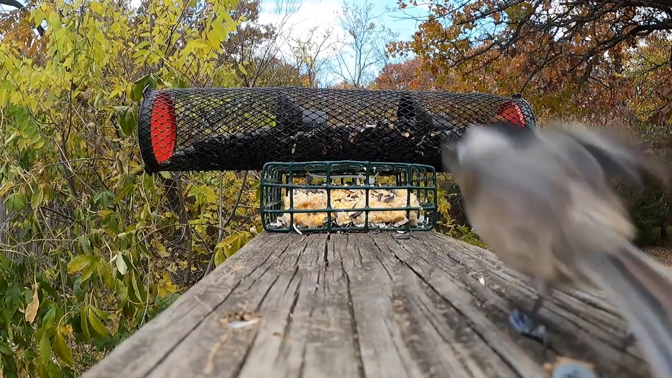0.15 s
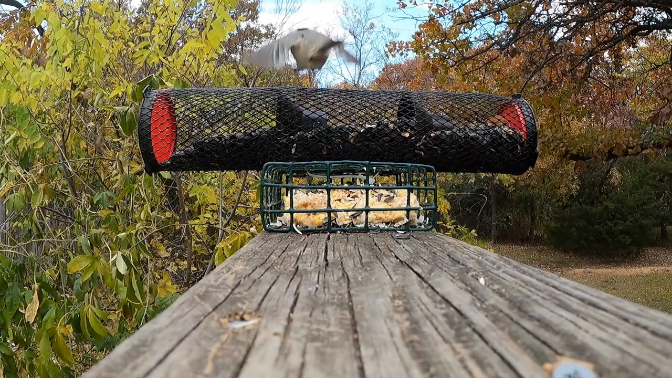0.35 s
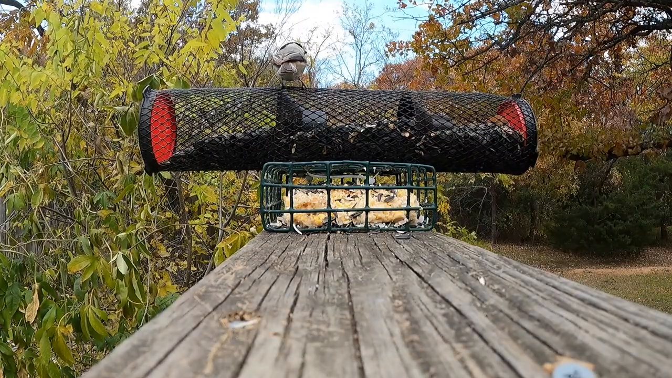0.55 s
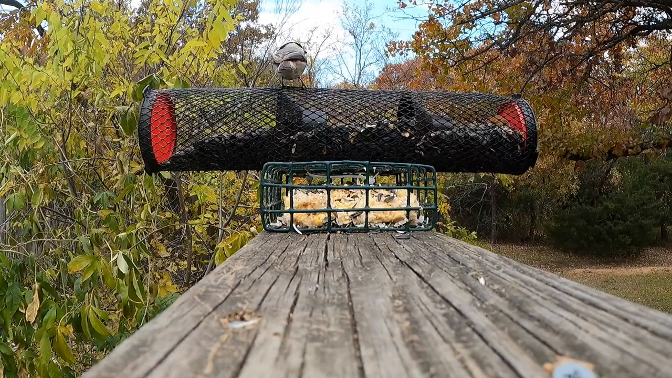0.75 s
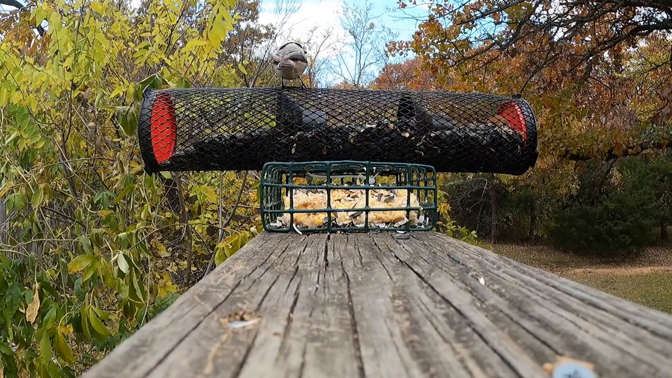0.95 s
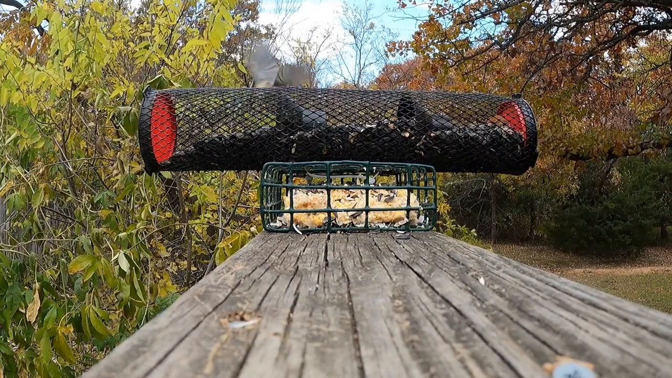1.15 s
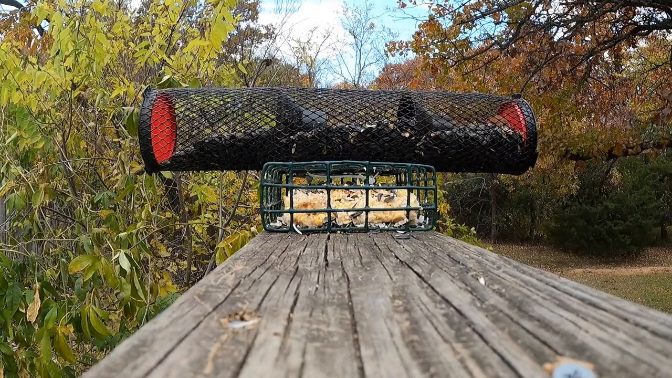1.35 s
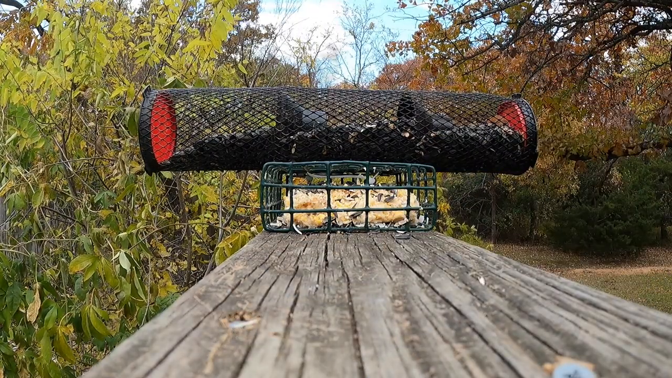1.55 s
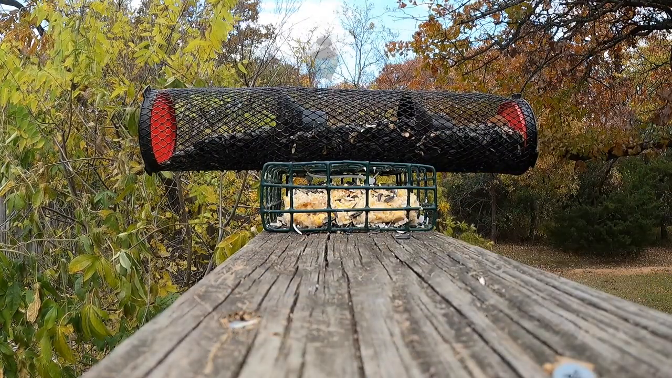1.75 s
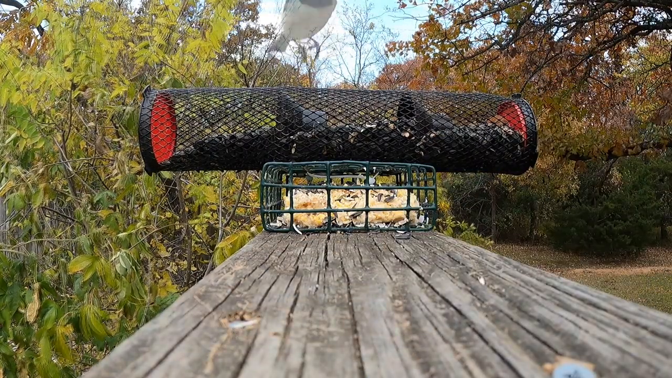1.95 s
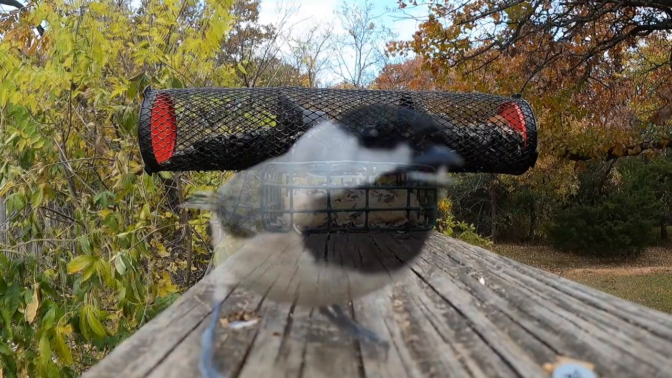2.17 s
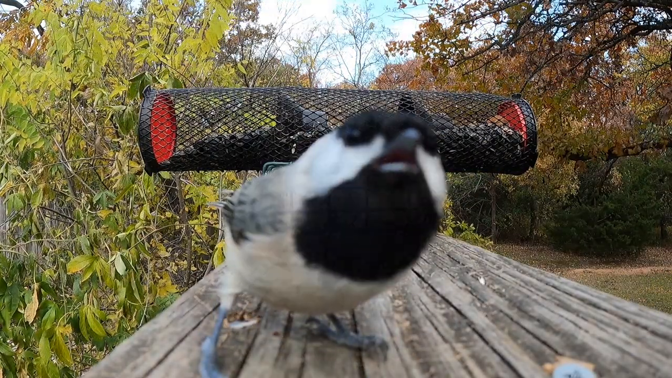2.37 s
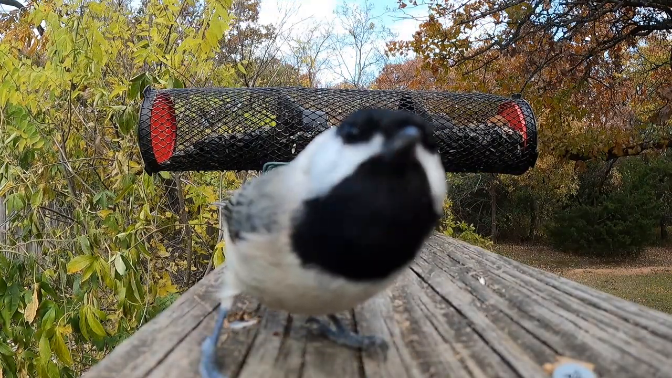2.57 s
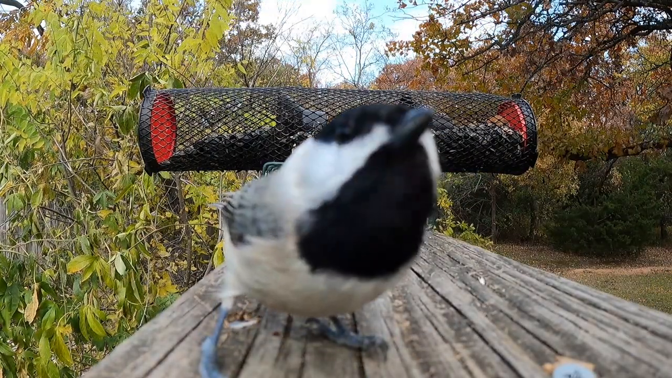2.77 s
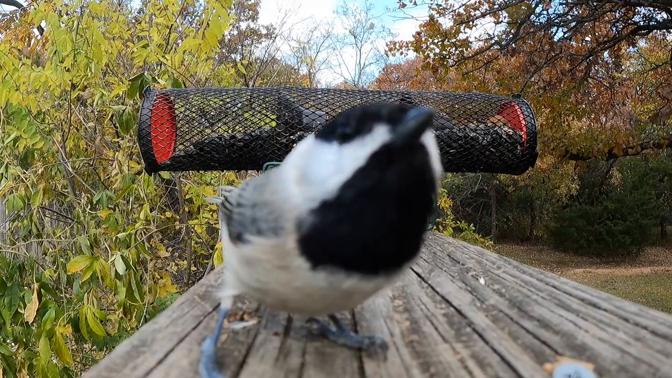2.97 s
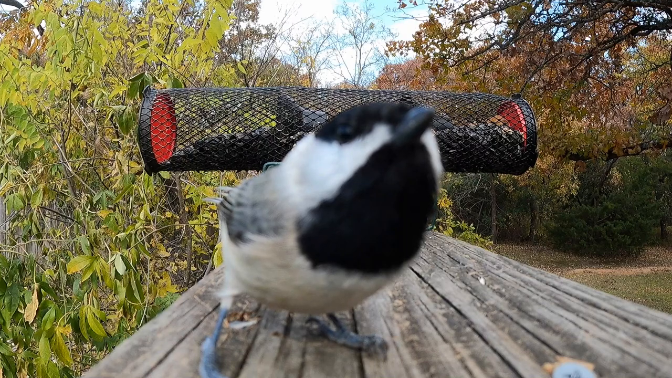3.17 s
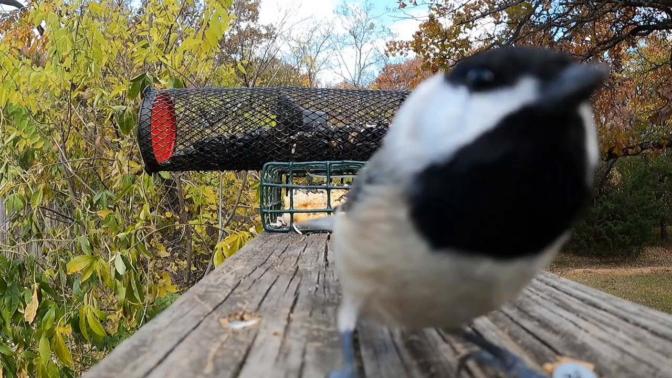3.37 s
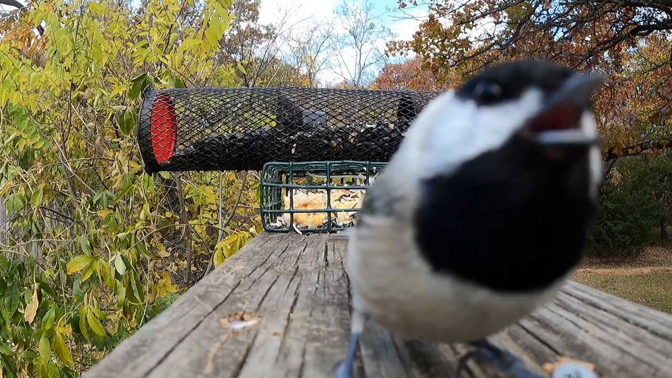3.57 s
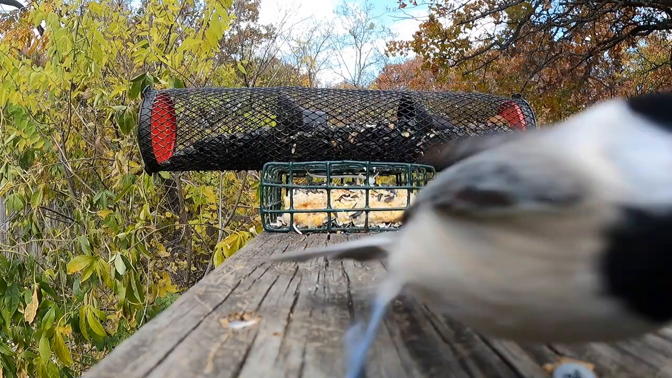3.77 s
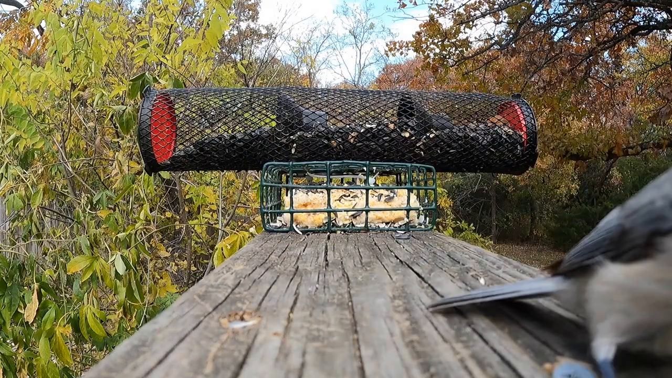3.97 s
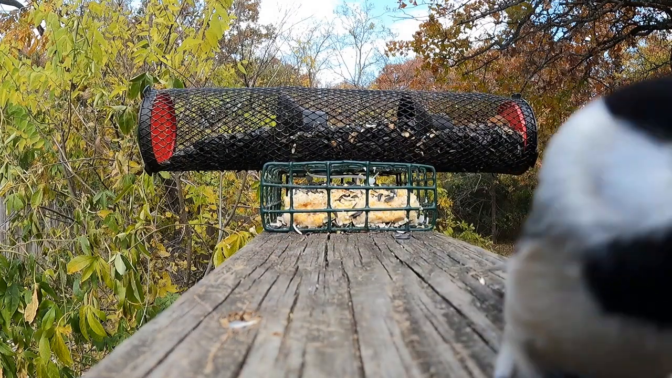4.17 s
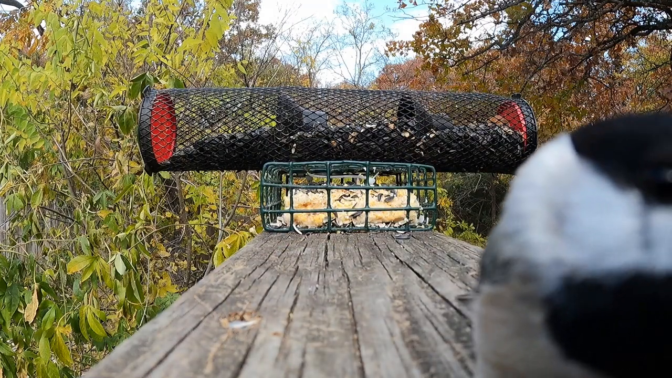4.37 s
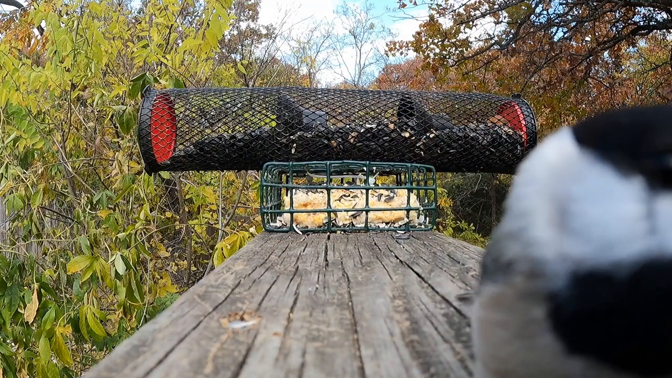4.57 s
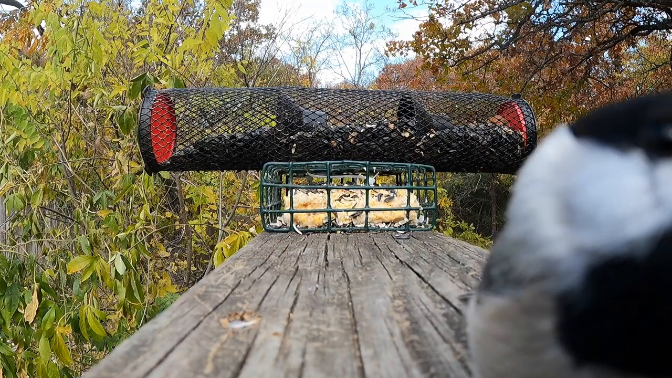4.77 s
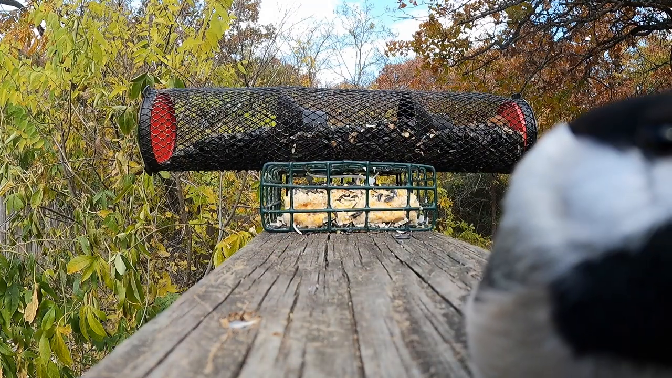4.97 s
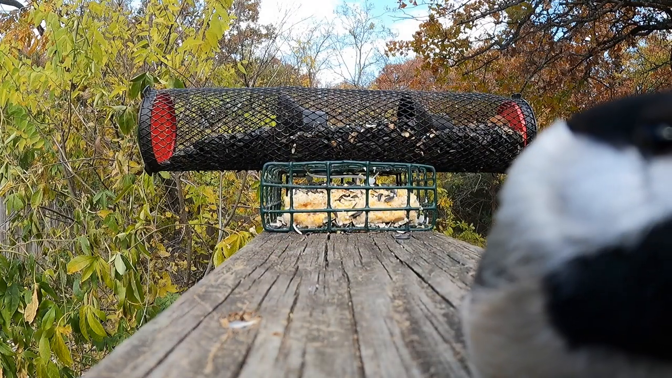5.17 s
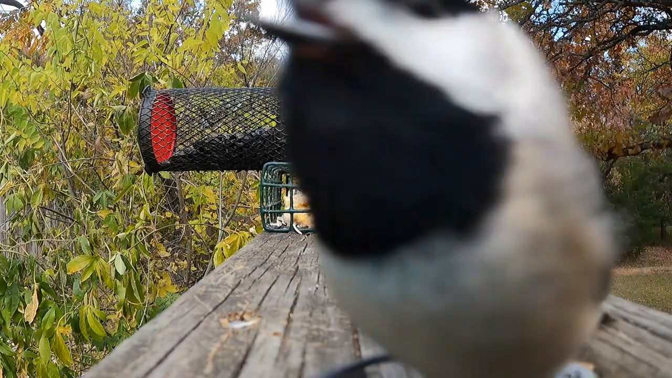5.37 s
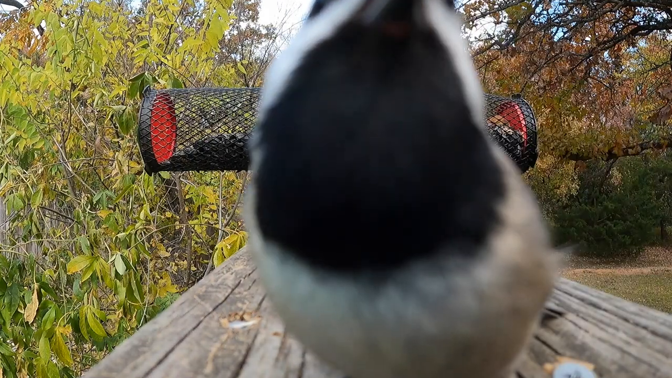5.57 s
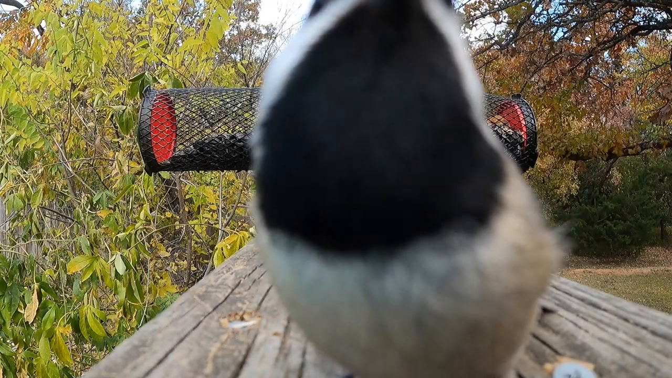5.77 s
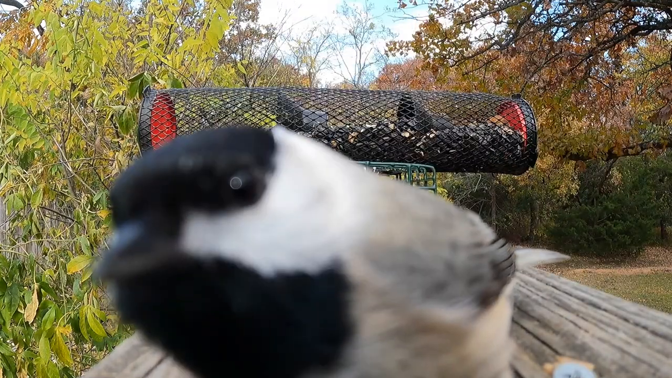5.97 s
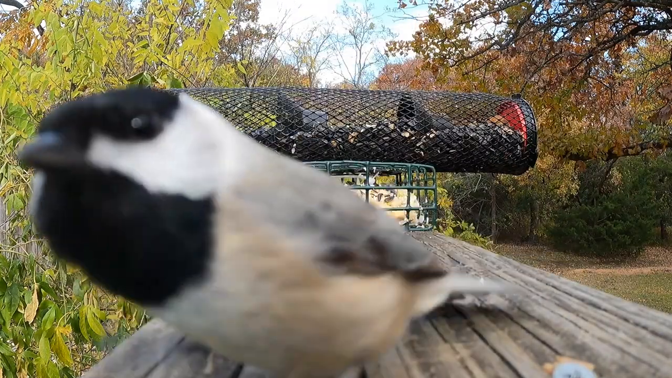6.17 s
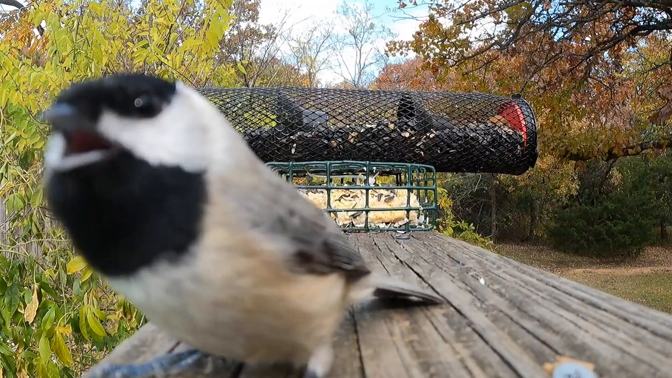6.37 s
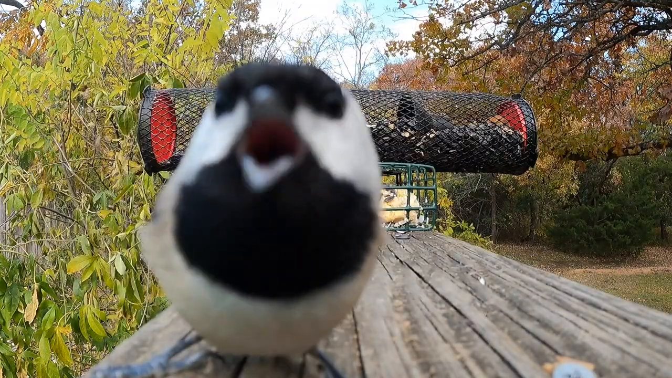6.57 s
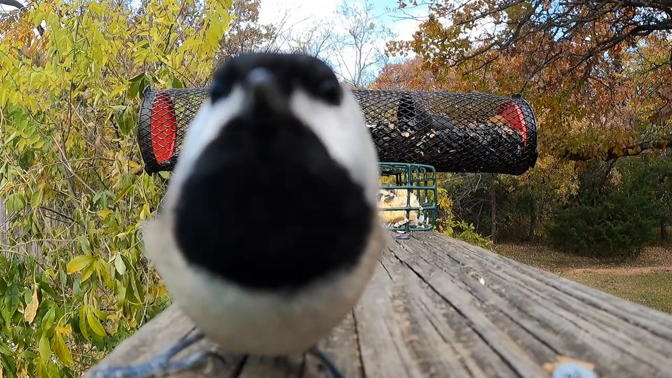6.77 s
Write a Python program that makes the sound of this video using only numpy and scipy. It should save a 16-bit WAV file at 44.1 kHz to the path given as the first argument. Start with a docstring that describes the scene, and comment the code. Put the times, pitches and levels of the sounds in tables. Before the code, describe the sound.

A chickadee flutters off and lands on a wooden plank with soft scuffs, then sings short, bright, gurgling phrases very close to the microphone.

```python
"""Chickadee on a plank feeder

A chickadee sings five gurgling phrases at arm's length from a stereo microphone.
Its two-sided voice box is built from gliding tones: whistles, quick sweeps, trills and buzzy warbles.
Shaped noise makes its breath, wings, claws, a low rumble, a soft higher background and a faint hiss;
short low waves make thumps."""
import sys
import numpy as np
from scipy import signal
from scipy.fft import rfft, irfft, next_fast_len
from scipy.io import wavfile
from scipy.ndimage import uniform_filter1d, map_coordinates

SR = 44100
rng = np.random.default_rng(int(sys.argv[2]) if len(sys.argv) > 2 else 0)


def digitize_waveform(pressure):
    """Quantize a signal to 16-bit integers and store it at the path in sys.argv[1].

    Rows of a 2-D input are taken as channels; values are limited to [-1, 1].
    """
    field = np.atleast_2d(pressure).T
    bounded = np.clip(field, -1, 1)
    quanta = np.round(bounded * 32767).astype(np.int16)
    wavfile.write(sys.argv[1], SR, quanta)


N = 301203  # length of the scene in samples

# held whistles: [start t/s, scoop t/ms, attack t/ms, release t/ms, length t/ms,
#   first f/Hz, early f/Hz, late f/Hz, level/dB, swell/dB]
WHISTLES = [(2.2172, 8, 6, 22, 46, 6110, 7600, 7314, -17.5, 5),
            (2.3281, 3, 5, 24, 52, 6967, 6070, 6450, -11.5, 0.5),
            (3.502, 12, 21, 12, 39.5, 6880, 7700, 7110, -19.5, 4.3),
            (3.591, 3, 7, 35, 59.6, 7100, 6070, 6520, -13, 1.8),
            (4.3093, 5.5, 21, 9.4, 46.4, 6036, 7620, 7320, -11.5, -5),
            (4.4073, 2.5, 6.4, 14, 55, 7410, 6090, 6450, -13, 0.7),
            (5.46, 2.6, 2.2, 15, 34, 4350, 4440, 4930, -21.5, 2),
            (6.44, 5.1, 9, 16, 42, 10350, 9960, 9500, -52.5, 10.5),
            (6.737, 8.4, 12, 12.5, 61.4, 1960, 3230, 3402, -18.5, 7.5)]
# bent whistles, each sung once; a list of curves: [t/s, pitch f/Hz, level/dB]
GLIDES = [
    [(5.4107, 8030, -39), (5.4165, 6600, -13), (5.4203, 5950, -12), (5.4215, 6000, -12),
     (5.4238, 6740, -15), (5.4252, 7400, -39)],
    [(5.4595, 4310, -34), (5.4615, 4830, -14), (5.4631, 5680, -13), (5.466, 6280, -18), (5.4723, 6460, -18),
     (5.4928, 6500, -15), (5.5001, 6120, -13), (5.5057, 5160, -13), (5.5257, 1850, -42)],
    [(6.3438, 6490, -40), (6.3494, 7360, -27), (6.367, 7020, -17), (6.377, 6040, -11), (6.3788, 6240, -13),
     (6.3808, 6910, -40)],
    [(6.6405, 9290, -46), (6.647, 8300, -32), (6.6527, 7920, -22), (6.6569, 7770, -20), (6.6601, 7180, -17),
     (6.6623, 6550, -20), (6.6647, 6420, -45)],
    [(6.4488, 5000, -46), (6.4553, 4910, -33), (6.47, 4850, -29), (6.4816, 4540, -26), (6.4854, 4910, -14),
     (6.4863, 4810, -19), (6.4878, 4320, -44)],
]
# short sweeps, including the high trill's first dips, the last pip's upturn and faint mixing tones:
#   [start t/s, rise t/ms, fall t/ms, first f/Hz, peak f/Hz, last f/Hz, peak level/dB]
SHORT_SWEEPS = [(3.478, 22, 12, 6210, 7000, 7400, -56.5), (5.3195, 4, 6, 6370, 7500, 8000, -52.5),
                (5.33, 6, 29, 6290, 7890, 7960, -46.5), (5.4013, 1.6, 3.2, 5540, 6770, 6500, -32.5),
                (5.4248, 1.9, 4, 8850, 9200, 9100, -39.5), (5.4464, 7, 7.5, 1390, 2890, 3530, -29.5),
                (5.449, 2.1, 7.3, 4300, 4700, 6350, -20), (5.46, 27, 56, 2570, 2810, 2900, -51.5),
                (5.506, 12.6, 9, 6100, 6760, 5840, -29), (5.531, 6.3, 3.9, 4430, 3850, 3280, -20),
                (5.5409, 0.79, 2.6, 4530, 5140, 4200, -18), (5.574, 0.75, 1, 7400, 5900, 4900, -11),
                (5.5828, 3.6, 2.1, 7000, 5100, 4886, -17), (5.593, 2.36, 2.1, 6100, 5230, 4510, -12.5),
                (5.8305, 5.1, 6, 2020, 2900, 2784, -31), (6.34, 1.8, 2.5, 3450, 6540, 8200, -40),
                (6.3799, 1.5, 2.4, 8100, 8200, 8800, -38.5), (6.5117, 1.4, 1.7, 2893, 3180, 3070, -24),
                (6.5115, 2.1, 2.5, 6160, 6400, 6030, -12.5), (6.515, 2.9, 4.9, 5470, 6400, 7500, -13.5),
                (6.518, 2.3, 13, 7260, 7540, 7860, -33), (6.5412, 2.1, 4.5, 6350, 2850, 1310, -31.5),
                (6.571, 2.6, 1.5, 6380, 5830, 6480, -13), (6.5735, 2.5, 6.4, 9200, 9500, 8660, -43),
                (6.585, 7.8, 7.3, 7440, 5840, 3240, -12.5), (6.5978, 3.2, 4, 2270, 6400, 5970, -20),
                (6.6414, 12, 11, 4480, 4620, 4420, -17.5), (6.645, 10.5, 9, 5530, 5910, 5590, -28.5),
                (6.646, 4.6, 24, 3480, 3220, 2900, -42), (6.675, 1.6, 3.7, 4900, 4310, 3700, -26),
                (6.7098, 2.2, 4.3, 4300, 4680, 4300, -19)]
# five syllables that come back, each a few short sweeps:
#   [start t/ms, rise t/ms, fall t/ms, first f/Hz, peak f/Hz, last f/Hz, peak level/dB], before stretching
SYLLABLES = [
    [(1, 2.2, 4.2, 4950, 5430, 4440, -17.5), (5.4, 3.9, 3.6, 4340, 4320, 4480, -18.5),
     (14.6, 3.8, 5.3, 3250, 2920, 1760, -26.5)],
    [(.6, 1.6, 7.5, 2900, 2850, 1950, -30), (.6, 2.2, 6.5, 6050, 5800, 3650, -28),
     (2.3, 4.2, 3.1, 8600, 6150, 6350, -26.5), (10, 14, 6.6, 4880, 5390, 5610, -12.2),
     (24.7, 4.7, 4.7, 3300, 5190, 5700, -11),],
    [(1.6, 2.9, 4, 3330, 3770, 4510, -25), (1.6, 1.8, 3.9, 6400, 6930, 7900, -26)],
    [(0, 18, 5, 10100, 9750, 8500, -38), (13.8, 6.7, 2.5, 4400, 4740, 4400, -24)],
    [(0, 1.1, 1.5, 2000, 4000, 7000, -38), (3.6, 3.5, 4.7, 3350, 2950, 2450, -21),
     (14, 5.4, 10, 1560, 1890, 2300, -28), (29.5, 1.1, 6.5, 4500, 5200, 9500, -24),
     (34.4, 4.2, 10.5, 3160, 3110, 1400, -26), (44, 8, 8, 1800, 1150, 1700, -49)],
]
# when each syllable is sung, one list per syllable: [t/s, stretch in time, added level/dB]
SUNG = [
    [(2.397, 0.87, 0.5), (3.6661, 0.94, 1.5), (4.4845, 0.92, 0)],
    [(2.438, .98, 0.16), (3.7051, 1.035, -0.2), (4.5255, 1.034, -1.4)],
    [(2.523, 0.7, 3), (3.792, 0.62, 4), (4.6133, 1.05, 2.5), (6.4327, 0.91, 2), (6.6335, 0.905, 2.5)],
    [(2.5305, 0.97, 2), (3.7998, 1.2, -3), (4.6217, 1.14, -2)],
    [(2.572, 0.97, 0), (3.8412, 0.99, 0.5), (4.6647, 1, 0.1), (6.676, 1.074, -0.4)],
]
# hooked notes of the second and fifth syllable, keyed by syllable index:
#   [t/ms from its start before stretching, pitch f/Hz, level/dB]
HOOKS = {1: [(34.1, 5450, -37), (38, 5050, -20), (42.1, 4890, -14), (48.8, 4630, -12), (51, 4470, -13),
         (53.3, 5430, -12), (56.2, 5740, -40)], 4: [(20.1, 3620, -43), (22.8, 3910, -17), (25.5, 3690, -15),
         (28.6, 3320, -22), (30.8, 4920, -13), (33, 4900, -42)]}
# high trill of V-shaped dips: [t/s, dips per second f/Hz, bottom pitch f/Hz, level/dB]
TRILL = [(5.6, 122, 4500, -12), (5.64, 123, 4300, -12.5), (5.69, 121, 3850, -13), (5.712, 104, 3450, -14),
         (5.7255, 104, 3350, -19)]
# one falling pip of the low trill: [share of its length, pitch f/Hz, level/dB]
PIP = [(0, 3200, -26), (.15, 3050, -3), (.5, 2880, -.3), (.82, 2650, -2), (1, 2150, -26)]
# when the pips come: [t/s, length t/ms, added level/dB]
PIPS = [(5.727, 12.3, -22.5), (5.7437, 9.4, -21), (5.7567, 10.6, -20.5), (5.7701, 13.2, -21.5),
        (5.782, 11.5, -20), (5.7951, 11.5, -19.5), (5.808, 13, -21), (5.822, 12, -22.5)]
# buzzy closing notes: [start t/s, length t/s, first swing rate f/Hz, last swing rate f/Hz, top f/Hz,
#   added level/dB, turns of the swing done at the start]
WARBLES = [(2.628, .21, 283, 257, 2617, -18, .62), (3.896, 0.29, 283, 270, 2697, -22, 0.78),
           (4.725, .191, 277, 252, 2676, -18.5, 0.88)]
# their common course: [share of length, middle below the top f/Hz, swing before widening f/Hz, level/dB]
WARBLE_COURSE = [(0, 1000, 150, -34.5), (.05, 450, 279.4, -17), (.17, 110, 415, -4),
                 (0.348, 20, 380, -0.96), (.6, 5, 380, -0.85), (.87, 40, 450, -2.75), (0.958, 250, 450, -8),
                 (1, 500, 441, -28)]
# the throat favours the overtones of low notes: [pitch f/Hz, 2nd level/dB, 3rd level/dB, 4th level/dB]
OVERTONES = [(1480, 7, -27, -35), (2330, -1.5, -32, -34), (2644, -12.5, -33.5, -59),
             (2880, -23, -58, -53.5), (3240, -32, -53.5, -51.5), (4000, -36, -60.5, -70),
             (4800, -53.5, -68.5, -98.5), (6534, -51, -82.5, -99), (8000, -60.5, -81, -99)]
# sum and difference tones of the two voices: [f/Hz, level/dB]
MIXING = [(1000, -77), (1900, -5), (3000, -46.5), (8000, -64.5), (11000, -30), (13000, -32), (15000, -42.5)]
# colour of the air rushing past the membranes: [f/Hz, relative level/dB]
BREATH = [(1500, -57), (2500, -14), (5000, 11), (8000, -8), (9000, -21), (11500, -16.5), (13200, -19),
          (14000, -57.5)]
# colour of the air in the high trill: [f/Hz, relative level/dB]
TRILL_AIR = [(3000, -50), (5000, 9), (8000, 0), (9000, -35), (10200, -9), (13000, -12), (14000, -54.5)]
# the head turns: [t/s, left minus right level/dB, left lag t/us]
HEAD = [(2.2, -1.5, 18.8), (3.39, -6, 14.6), (3.5, -11.5, 18), (3.7, -3, 14.5), (4.11, -9.5, 8.8),
        (4.29, -3.5, 9), (4.95, -6, 13), (4.97, 4, 15), (6.24, -5, 16.6), (6.35, 5.5, 8.3),
        (6.83, -3.5, 36)]
# feathers swish as wings beat: [t/s, length t/s, level/dB]
WINGS = [(0.181, 0.054, -51.5), (0.217, 0.11, -48), (0.397, 0.092, -72), (0.922, 0.056, -64.5),
         (1.103, 0.14, -68.5), (1.193, 0.1, -54), (1.273, 0.11, -62), (1.495, 0.15, -73),
         (1.841, 0.14, -67.5), (2.052, 0.24, -52.5), (2.136, 0.097, -54.5), (3.347, 0.11, -66.5),
         (6.259, 0.05, -66.5)]
# colour of the feather noise: [f/Hz, relative level/dB]
FEATHERS = [(240, -21), (400, 3.5), (735, 4.5), (1290, -5.5), (1840, -0.5), (2680, -13.5), (4860, -5),
            (7800, -14), (10100, -86), (17200, -120)]
# claws scuff the plank and the mesh: [t/s, level/dB before a 1 dB lift, centre f/Hz, 60 dB fade t/s]
CLAWS = [(0.2044, -53, 4640, 0.029), (0.2469, -37, 1360, 0.054), (0.253, -40, 1460, 0.023),
         (0.2857, -42.5, 1890, 0.015), (0.464, -54.5, 5150, 0.044), (1.2379, -49, 1810, 0.013),
         (1.2784, -51, 1810, 0.022), (1.7374, -65, 5180, 0.023), (1.9001, -63.5, 4260, 0.022),
         (2.157, -52, 2380, 0.017), (2.163, -32.5, 1910, 0.033), (2.1984, -50, 7140, 0.0094),
         (3.3544, -55.5, 2120, 0.025), (3.373, -58.5, 4500, 0.058), (4.2137, -55, 2042, 0.096)]
# soft thumps of air and feet: [t/s, peak level/dB, pitch f/Hz]
THUMPS = [(0.208, -36, 87), (0.243, -34, 91.5), (0.258, -31.5, 62.4), (0.289, -53, 102), (0.319, -44, 48.7),
          (0.618, -39, 119), (1.226, -33, 267), (1.264, -46, 138), (1.299, -31.5, 255), (1.376, -37, 293),
          (1.4, -29.5, 150), (1.649, -46.5, 53.5), (2.127, -41, 124), (2.159, -35.5, 147),
          (3.088, -57.5, 168), (3.599, -46, 79.5), (4.43, -54, 86), (4.587, -52, 197), (5.429, -43.5, 131),
          (5.468, -57, 78.6), (6.359, -47, 137)]
# background noise, mostly quieter once the song starts, before small level shifts:
#   [t/s, low rumble level/dB, higher noise level/dB]
BACKGROUND = [(0.0, -59, -75), (0.11, -72, -73), (0.25, -36, -59), (0.38, -52, -59.5), (0.64, -45, -55),
              (0.93, -58, -60), (1.45, -42.5, -57.5), (1.5, -54, -61.5), (2.11, -47.5, -67),
              (2.32, -53, -81.5), (2.61, -67.5, -78.5), (3.52, -69.5, -81), (3.61, -59, -82.5),
              (3.67, -65, -82.5), (5.36, -72.5, -78), (5.42, -44, -91), (5.54, -67.5, -78),
              (6.83, -61, -85.5)]
# colour of the low rumble: [f/Hz, relative level/dB]
RUMBLE = [(12, -49.5), (20, -12.5), (113, 2.5), (208, -4.5), (275, -11), (323, -10.5), (400, -21),
          (520, -43), (880, -120)]
# colour of the soft higher background noise: [f/Hz, relative level/dB]
HIGHER_NOISE = [(88, -29.5), (150, -5), (300, -6.5), (510, -2.5), (572, -5), (1000, -9.5), (1110, -14.5),
                (1730, -25.5), (2750, -43), (3190, -39), (7800, -45.5), (10100, -91), (17200, -120)]
# colour of the steady faint hiss: [f/Hz, relative level/dB]
HISS = [(710, -30), (1200, -4.5), (1430, -4.5), (1680, -9), (3050, -24.5), (4650, -28), (7800, -35),
        (10100, -64.5), (17200, -120)]
# how alike stereo noise is at the two microphone ports: [f/Hz, left-right likeness from 0 to 1]
SAME = [(60, 0.45), (200, 0.95), (660, 0.73), (2210, 1), (7350, 1)]

EDGE_HZ = 16200  # upper limit of the sound
EDGE_DB, ROUND = -28, 2.3  # level at a note's edge under its peak; power that rounds the rise and fall
DROOP_HZ_PER_MS, SHUT_DB, CUT = 14, -26, 4  # whistle endings: pitch droop, level drop, its steepness
HISS_DB = -83


def bird():
    """Adds up all notes and their breath; the two voices mix a little in the windpipe."""
    voice = np.zeros(N)
    for row in WHISTLES:
        add(voice, *whistle(*row))
    for rows in GLIDES:
        add(voice, *sweep(rows))
    for row in SHORT_SWEEPS:
        add(voice, *short_sweep(*row))
    for syllable, sung in zip(SYLLABLES, SUNG):
        for s, stretch, db in sung:
            for ms, rise, fall, *hz, peak_db in syllable:
                start = s + ms * stretch / 1000
                add(voice, *short_sweep(start, rise * stretch, fall * stretch, *hz, peak_db + db))
    for which, hook in HOOKS.items():
        for s, stretch, db in SUNG[which]:
            add(voice, *sweep(np.array(hook) * [stretch / 1000, 1, 1] + [s, 0, db]))
    # the pips and warbles come after this step, so they get no breath
    air = breath(voice, BREATH)
    for s, ms, db in PIPS:
        add(voice, *sweep(np.array(PIP) * [ms / 1000, 1, 1] + [s, 0, db]))
    high_trill = np.zeros(N)
    add(high_trill, *trill())
    air = air + breath(high_trill, TRILL_AIR, level_db=-20.5)
    voice = voice + high_trill
    for *row, turns in WARBLES:
        add(voice, *warble(warble_curve(*row), turns))
    # squaring the voice creates sum and difference tones
    return voice + coloured(voice ** 2, MIXING) + air


def whistle(s, scoop, attack, release, length, first_hz, early_hz, late_hz, db, swell_db):
    """A held note: it scoops to its pitch, drifts, swells or fades, then droops as it is cut off."""
    ms = np.linspace(0, length, num=80)
    ending = np.clip(1 - (length - ms) / release, 0, 1)
    hz = np.interp(ms, [0, scoop, length], [first_hz, early_hz, late_hz])
    hz = hz - DROOP_HZ_PER_MS * release * ending ** 2
    attack_db = EDGE_DB * np.clip(1 - ms / attack, 0, 1) ** ROUND
    release_db = SHUT_DB * ending ** CUT
    return sweep(np.c_[s + ms / 1000, hz, db + swell_db * ms / length + attack_db + release_db])


def short_sweep(s, rise, fall, first_hz, peak_hz, last_hz, db):
    """A quick sweep through three pitches; the level rises to a rounded peak and falls again."""
    ms = np.r_[np.linspace(-rise, 0, num=12), np.linspace(0, fall, num=12)[1:]]
    away = np.where(ms < 0, -ms / rise, ms / fall)  # 0 at the peak, 1 at both edges
    hz = np.interp(ms, [-rise, 0, fall], [first_hz, peak_hz, last_hz])
    return sweep(np.c_[s + (ms + rise) / 1000, hz, db + EDGE_DB * away ** ROUND])


def sweep(rows):
    """One note along its curve: held pitches are pure, quick glides are pushed harder and turn hoarse."""
    s, (hz, db) = spread(rows)
    khz_per_ms = uniform_filter1d(abs(np.gradient(hz)) * SR / 1e6, size=130, mode="nearest")
    push_db = 1.8 * np.clip(khz_per_ms / 0.55, 0, 1)
    rough_db = -37.5 + 19.5 * np.clip(khz_per_ms / 0.242, 0, 1)
    return s, tone(hz, gain_of(db + push_db), rough_db)


def trill(turns=0.82, top_hz=7800, throat_hz=4700, fall_db=5, bend=1.8, dive_db=2.5):
    s, (rate, low_hz, db) = spread(TRILL)
    turn = np.pi * (turns + np.cumsum(rate) / SR)  # each half turn is one dip
    hz = low_hz + (top_hz - low_hz) * abs(np.cos(turn)) ** bend
    khz_away = (hz - throat_hz) / 1000
    db = db - fall_db * khz_away ** 2 + dive_db * np.sin(2 * turn)
    return s, tone(hz, gain_of(db), rough_db=-37.0)


def warble_curve(s, length, first_rate, last_rate, top_hz, db):
    """Stretches the common course over one warble, with swings that slow down."""
    share, below, swing, level_db = np.transpose(WARBLE_COURSE)
    rate = first_rate + (last_rate - first_rate) * share
    return np.c_[s + share * length, rate, top_hz - below, swing, db + level_db]


def warble(rows, turns, dip=.2, rise_db=11):
    """The pitch swings some 270 times a second, unevenly, with sharp dips; it is louder near each top."""
    rows = np.array(rows)
    # blend the levels as power, not as decibels
    s, (rate, hz, swing, power) = spread(np.c_[rows[:, :4], gain_of(rows[:, 4]) ** 2])
    uneven_rate = rate * (1 + .03 * wander(len(hz), ms=12))
    turn = 2 * np.pi * (turns + np.cumsum(uneven_rate) / SR)
    off_hz = swing * 1.17 * (np.cos(turn) - dip * np.cos(2 * turn))
    drift_hz = 28 * wander(len(hz), ms=14) + 25 * wander(len(hz), ms=4)
    level = np.sqrt(power) * gain_of(rise_db * off_hz / 1000)  # rise_db is per kHz
    return s, tone(hz + off_hz + drift_hz, level, rough_db=-58)


def tone(hz, level, rough_db=-34):
    """A vibrating membrane: near sine with overtones, slightly unsteady, soft at both ends."""
    hz = uniform_filter1d(hz, size=24, mode="nearest")
    level = uniform_filter1d(level, size=24, mode="nearest")
    turn = 2 * np.pi * (np.cumsum(hz) / SR + rng.random())
    wave = np.sin(turn)
    for k in (2, 3, 4):
        in_band = k * hz < EDGE_HZ
        wave = wave + gain_of(read(OVERTONES, hz, axis=k - 1)) * np.sin(k * turn) * in_band
    flutter = 1 + gain_of(rough_db) * wander(len(hz), ms=0.83)
    count = np.arange(len(hz))
    ends = np.clip(np.minimum(count, count[::-1]) / (0.00035 * SR), 0, 1)  # 0.35 ms fades
    return np.sqrt(2) * level * wave * flutter * np.sin(ends * np.pi / 2) ** 2


def breath(voice, spectrum, level_db=-16):
    """Air hisses where the bird starts, stops and throbs its notes, hardly in held ones."""
    level = np.sqrt(abs(uniform_filter1d(voice ** 2, size=60)))
    change = uniform_filter1d(abs(level - uniform_filter1d(level, size=350)), size=120)
    # a level that fades out after the voice keeps air from coming before a note
    lingering = np.sqrt(abs(signal.lfilter([.004], [1, -.996], voice ** 2)))
    air = evened(coloured(rng.standard_normal(N), spectrum))
    return gain_of(level_db) * np.minimum(change, lingering) * air


def placed(x):
    """Level and arrival time at the two microphone ports follow the head."""
    t = np.arange(N) / SR
    s, pan_db, lag_us = np.transpose(HEAD)
    pan = gain_of(np.interp(t, s, pan_db))
    late = np.interp(t, s, lag_us) * 1e-6 * SR / 2  # half the lag for each port, in samples
    ports = [map_coordinates(x, [np.arange(N) - side * late], order=3) for side in (1, -1)]
    return np.array(ports) * [2 * pan / (1 + pan), 2 / (1 + pan)]


def yard(x, near_t60=0.06, far_t60=.3, far_db=-14, gap=.001):
    """Quick echoes from the plank and faint scattered ones from the branches, as fading noise."""
    t = np.arange(int(.3 * SR)) / SR
    fade = gain_of(-60 * t / near_t60) + gain_of(far_db - 60 * t / far_t60)  # t60: s to fall 60 dB
    tail = rng.standard_normal((2, len(t))) * fade * (t > gap)
    return signal.fftconvolve(x[None], tail / np.linalg.norm(tail[0]), axes=1)[:, :N]


def wings():
    """Wing beats swish: feather noise in uneven tufts, each swish weakening."""
    level = np.zeros(N)
    for s, length, db in WINGS:
        size = round(length * SR)
        add(level, s, gain_of(db) * signal.windows.tukey(size, .75) * np.linspace(1, .35, size))
    tufts = gain_of(2.5 * wander(N, ms=7))
    return level * evened(tufts) * noise(FEATHERS, patchy_db=2.5)


def feet():
    """Scuffs are short wide noise bursts; thumps are a cycle or two of low push."""
    out, t = np.zeros((2, N)), np.arange(4000) / SR
    for s, db, hz, t60 in CLAWS:
        spectrum = [(hz / 8, -14), (hz, 0), (12500, -8 * np.log2(12500 / hz)), (14000, -60)]
        grit = coloured(rng.standard_normal((3, len(t))), spectrum)
        both_sides = evened(grit[:2] * .5 + grit[2])  # the third noise is shared by left and right
        add(out, s, gain_of(db + 1 - 60 * t / t60) * np.clip(t / 0.00047, 0, 1) * both_sides)
    for s, db, hz in THUMPS:
        bump = np.exp(-(t * hz / 0.75 - 1) ** 2 * 1.9)  # strongest after three quarters of a cycle
        add(out, s, gain_of(db) * np.sin(2 * np.pi * hz * t) * bump * np.ones((2, 1)))
    return out


def background():
    """Low rumble and soft higher noise, each following its column of a level table."""
    s, rumble_db, higher_db = np.transpose(BACKGROUND)
    t = np.arange(N) / SR
    rumble = noise(RUMBLE, patchy_db=3.0) * gain_of(np.interp(t, s, rumble_db) - 2.5)
    higher = noise(HIGHER_NOISE, patchy_db=4.0) * gain_of(np.interp(t, s, higher_db) + 2.0)
    return rumble + higher


def hiss():
    """A faint noise with a steady overall level."""
    return gain_of(HISS_DB) * noise(HISS, patchy_db=3.0)


def noise(spectrum, patchy_db):
    """Stereo noise with drifting patches, rms 1, built from random slices of the spectrum."""
    frames, hz = N // 128 + 5, np.fft.rfftfreq(512, 1 / SR)
    a, b, c, d, patches = rng.standard_normal((frames, 257, 5)).T
    patches = uniform_filter1d(patches, size=8, axis=0)  # smooth over pitch
    patches = evened(uniform_filter1d(patches, size=10, axis=1))  # and over time
    same = np.clip(read(SAME, hz), -1, 1)[:, None]
    left = a + 1j * b
    right = same * left + np.sqrt(1 - same ** 2) * (c + 1j * d)
    slices = np.array([left, right]) * gain_of(patchy_db * patches)
    sound = signal.istft(slices, nperseg=512, noverlap=384)[1][:, :N]
    return evened(coloured(sound, spectrum))


def wander(size, ms):
    """Smooth chance of rms 1 that changes over the given time."""
    window = np.hanning(round(ms * SR / 1000) + 3)
    return evened(signal.fftconvolve(rng.standard_normal(size), window, "same"))


def coloured(x, spectrum):
    """Makes each frequency louder or softer by a spectrum in dB."""
    size = next_fast_len(x.shape[-1])
    gain = gain_of(read(spectrum, np.fft.rfftfreq(size, 1 / SR)))
    return irfft(rfft(x, size) * gain, size)[..., :x.shape[-1]]


def read(points, hz, axis=1):
    """Reads a table column at given frequencies, straight on a log axis."""
    points = np.array(points)
    return np.interp(np.log(hz + 1), np.log(points[:, 0] + 1), points[:, axis])


def spread(rows):
    """Gives the start time and the columns of a curve, one value a sample."""
    s, *columns = np.transpose(rows)
    t = np.arange(s[0], s[-1], 1 / SR)
    return s[0], [np.interp(t, s, c) for c in columns]


def add(mix, s, sound):
    """Mixes a sound in at a time in seconds."""
    part = mix[..., round(s * SR):][..., :sound.shape[-1]]
    part += sound[..., :part.shape[-1]]  # part is a view, so this changes mix itself


def gain_of(db):
    """Turns decibels into amplitude."""
    return 10 ** (np.asarray(db) / 20)


def evened(x):
    """Scales to rms 1, a standard average loudness."""
    return x / np.sqrt(np.mean(x ** 2) + 1e-20)


def scene():
    """Bird, echoes, wings, feet, background noise and hiss together."""
    voice = bird()
    song = placed(voice) + gain_of(-31.5) * yard(voice)
    return song + wings() + feet() + background() + hiss()


def record(dry):
    """Removes the sound above the upper limit with a steep low-pass filter."""
    low_pass = signal.firwin(511, EDGE_HZ, window=("kaiser", 9), fs=SR)
    return signal.oaconvolve(dry, low_pass[None], "same")


dry = scene()
out = record(dry)
digitize_waveform(out)
```